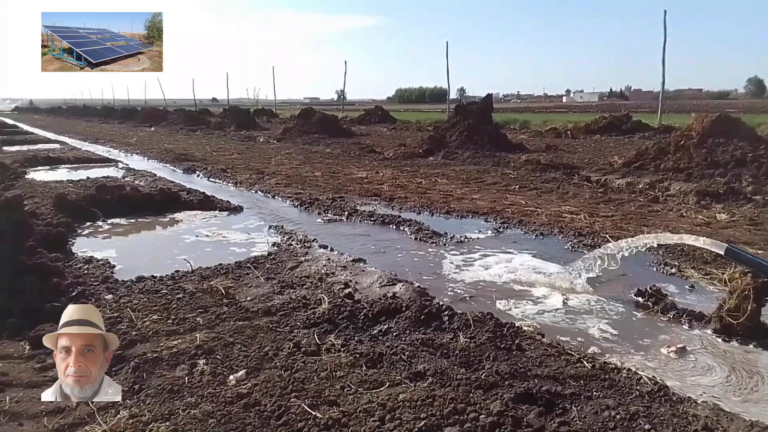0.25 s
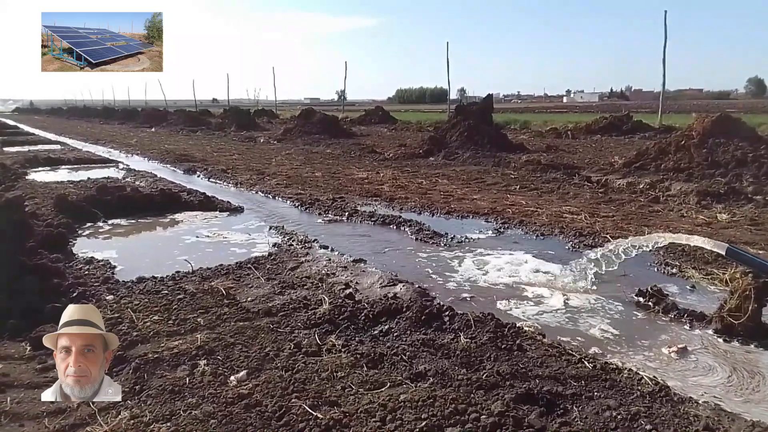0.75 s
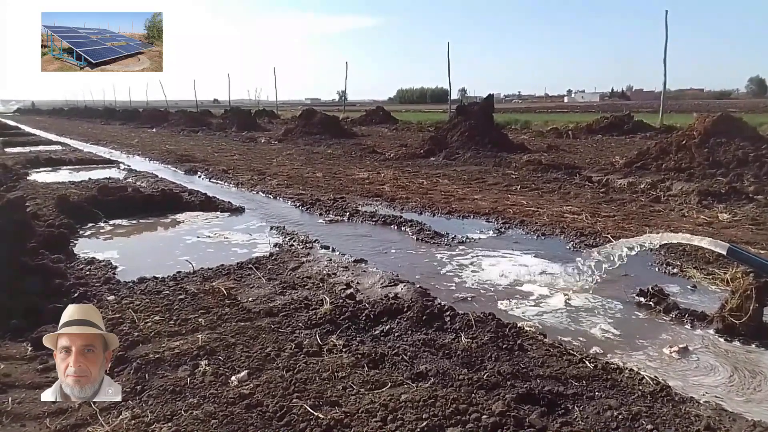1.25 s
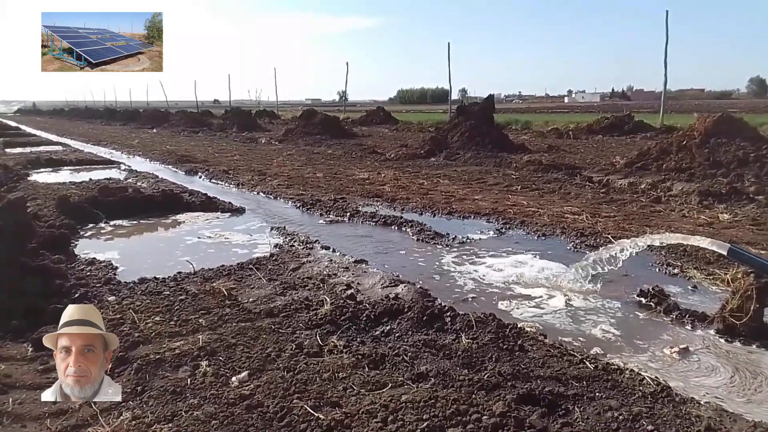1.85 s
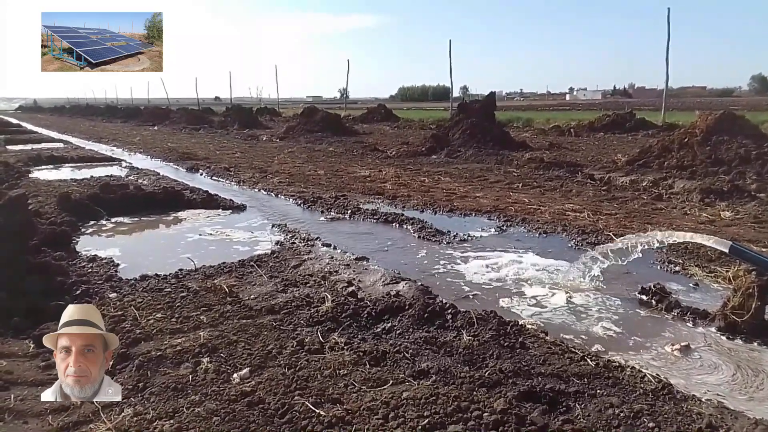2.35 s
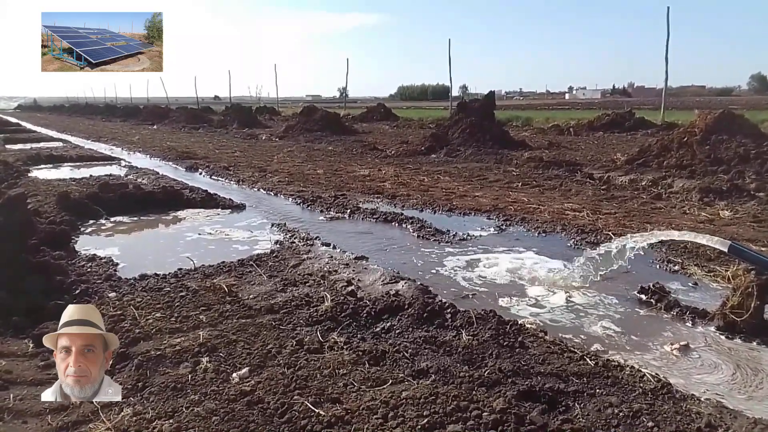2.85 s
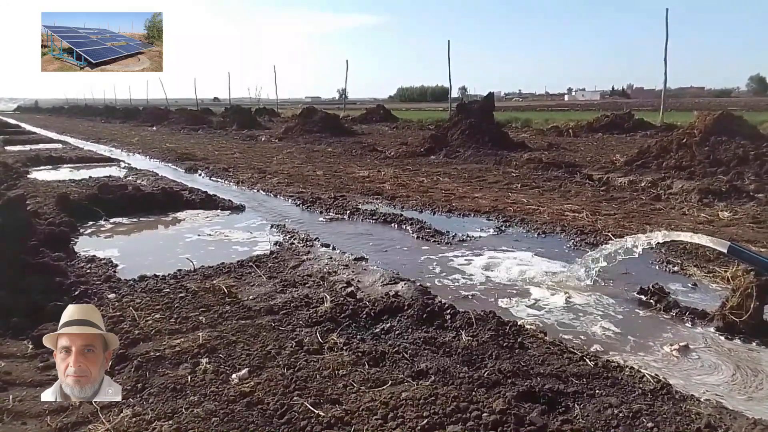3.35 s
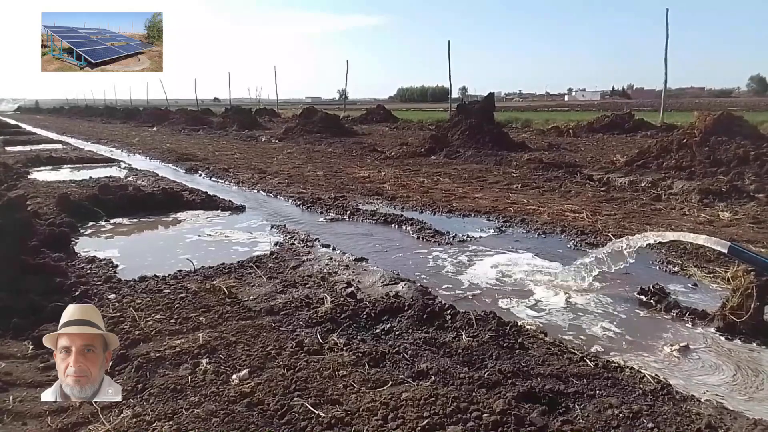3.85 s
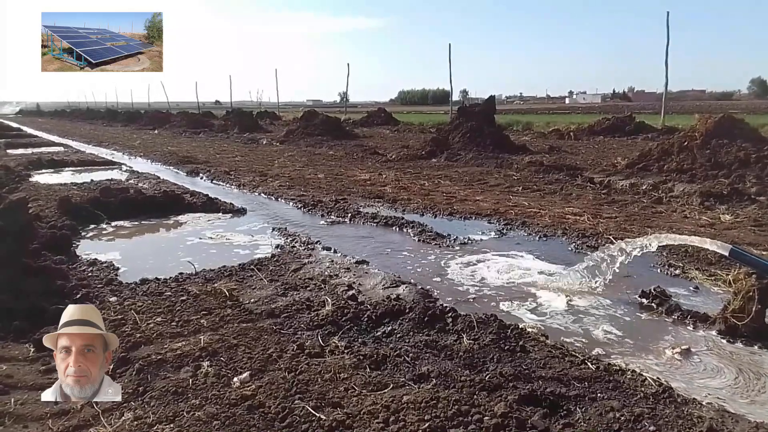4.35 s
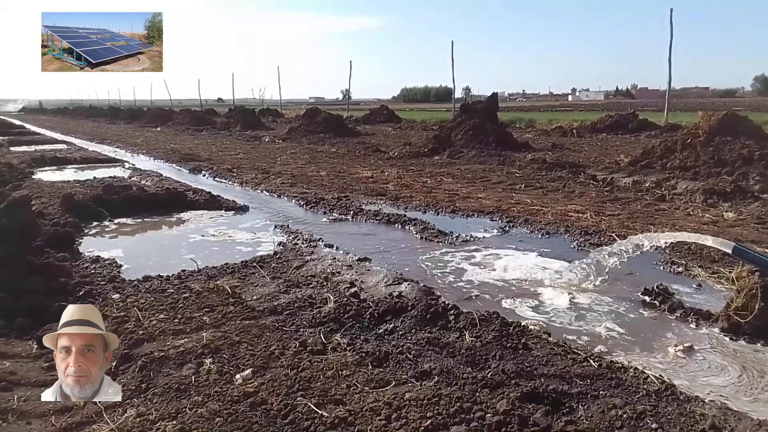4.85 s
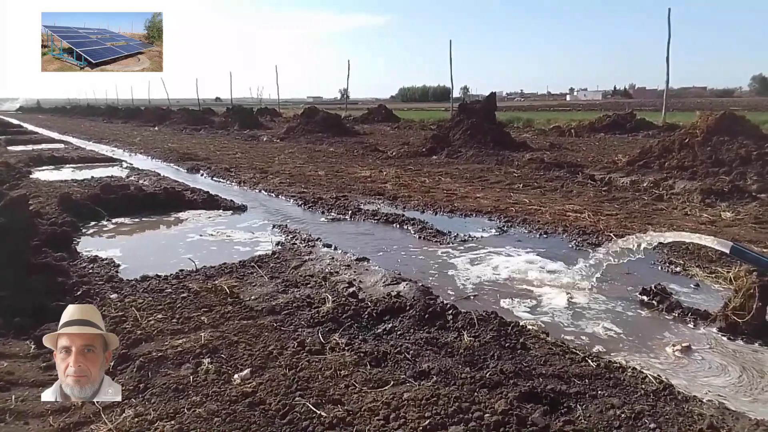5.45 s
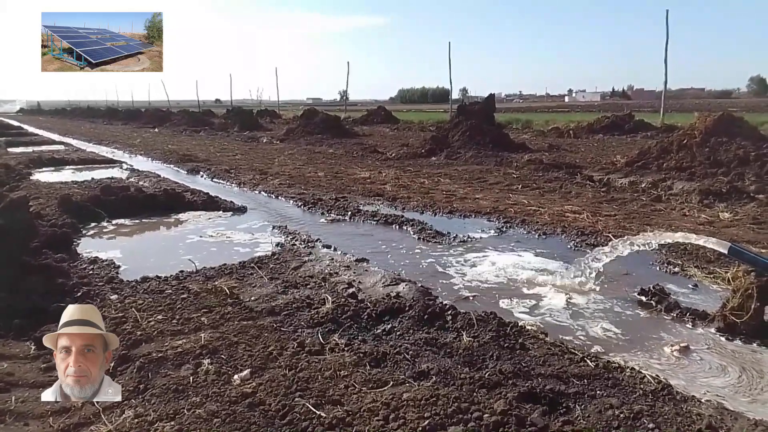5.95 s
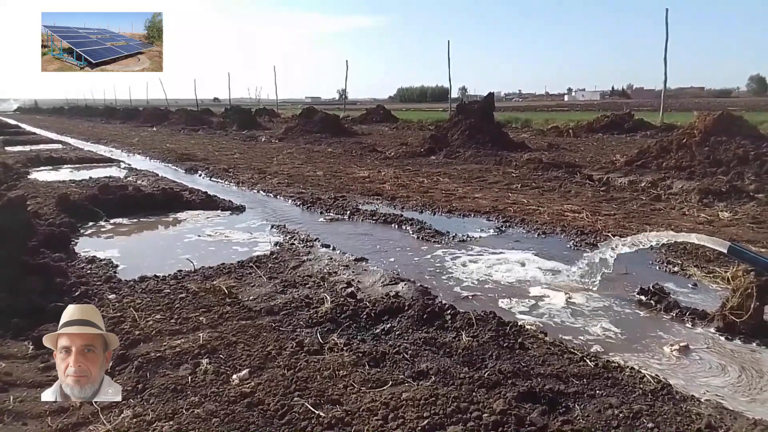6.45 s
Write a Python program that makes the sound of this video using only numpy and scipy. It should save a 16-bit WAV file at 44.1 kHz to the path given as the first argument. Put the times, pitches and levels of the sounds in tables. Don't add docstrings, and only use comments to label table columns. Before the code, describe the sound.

Water gushes from a hose into standing water, already running at the start and still running at the end. Trapped air bubbles ring briefly with pitches gliding slightly upward, deep gulps and weak low thuds sit underneath, and crackly hiss with tiny ticks lies on top. The level stays nearly steady, dipping briefly in the middle. Open air, dry and fairly near, practically mono, thin in bass, with a peaky, boxed-in treble.

```python
import sys
import numpy as np
from scipy import signal
from scipy.fft import irfft
from scipy.io import wavfile
from scipy.ndimage import uniform_filter1d

SR = 44100
rng = np.random.default_rng(int(sys.argv[2]) if len(sys.argv) > 2 else 0)


def materialize(psi):
    bounded = np.clip(np.atleast_2d(psi).T, -1, 1)
    quanta = np.round(bounded * 32767).astype(np.int16)
    wavfile.write(sys.argv[1], SR, quanta)


def convert_level_to_amplitude(level_db):
    exponent = np.asarray(level_db, float) / 20
    return 10 ** exponent


N = 295029

# (frequency [Hz], level [dB per Hz])
SPRAY_SPECTRUM = [(2290, -33.5), (3900, -25), (4640, -17.5), (5210, -16), (5560, -11.5), (6500, -13.5),
                  (6930, -10), (8100, -6.5), (8680, 1), (10000, 0.5), (10700, -3), (12800, -22),
                  (13900, -23), (15600, -31)]


def evened(x):
    return x / np.sqrt(np.mean(x ** 2) + 1e-20)


def add(mix, time_s, sound):
    part = mix[round(time_s * SR):][:len(sound)]
    part += sound[:len(part)]


def below(x, cutoff_hz):
    return signal.sosfiltfilt(signal.butter(3, cutoff_hz, fs=SR, output="sos"), x)


def causal(x, gain_db):
    log_gain = np.log(convert_level_to_amplitude(np.maximum(gain_db, -100)))
    mirrored = np.r_[log_gain, log_gain[-2:0:-1]]
    phase = -signal.hilbert(mirrored).imag[:len(log_gain)]
    taps = irfft(np.exp(log_gain + 1j * phase))[:2048]
    taps = taps[(None,) * (x.ndim - 1)]
    return signal.oaconvolve(x, taps, axes=-1)[..., :x.shape[-1]]


def coloured(x, spectrum):
    point_hz, level_db = np.transpose(spectrum)
    hz = np.fft.rfftfreq(8192, 1 / SR)
    return causal(x, np.interp(np.log(hz + 1), np.log(point_hz + 1), level_db))


def tremor(ms):
    size = max(int(ms * SR / 1000), 1)
    smooth = uniform_filter1d(rng.standard_normal(N), size)
    return evened(uniform_filter1d(smooth, size))


def swells(rows, half_s, column=1):
    rows = np.transpose(rows)
    coarse_s = np.arange(0, N + 100, 100) / SR
    humps = np.exp(-.5 * ((coarse_s - rows[0][:, None]) / half_s) ** 2)
    return np.interp(np.arange(N) / SR, coarse_s, rows[column] @ humps)


def flow():
    # (time [s], pool lift [dB], spray lift [dB])
    surges = [(0.155, -1.7, 2.5), (0.274, 0.2, 1.5), (0.359, 3, 2), (0.564, 1, 5), (0.943, 1, 2.3),
              (1.093, 0.5, 3.5), (1.312, 3.5, 3), (1.751, 0.4, 4.5), (2.085, 1, 4), (2.405, -0.3, 2.5),
              (2.534, -0.5, 3.5), (2.724, 1.5, 1.5), (2.928, 1, 2.5), (3.138, 1.5, 5), (3.417, 1, 3),
              (3.527, 4, 5.5), (3.896, 2, 2.5), (4.086, -0.5, 5), (4.375, 0.5, 1), (4.53, 3, 1),
              (4.664, 2.5, 2), (5.034, 0.7, 5.2), (5.163, 0.5, 3.5), (5.313, 1.2, 1.6), (5.398, 3, 0.5),
              (5.572, 0.6, 5), (5.946, -1, -0.5), (6.141, 0.8, 0.5), (6.351, 0.5, 1), (6.46, -2, 4)]
    # (time [s], level [dB])
    lulls = [(0.04, 1), (0.69, -1), (1.17, -1), (1.45, -1.5), (1.84, 0), (2.22, -3), (2.62, -2), (3.05, -1),
             (3.31, -1), (3.62, -3), (3.77, -5.5), (4.25, 0.5), (5.69, -1.5), (6.23, -3), (6.58, -0.5)]
    surge_s, lull_s = 0.027, 0.016
    pool_db, spray_db, patter_db = -35, -34, -47
    pool = swells(surges, surge_s)
    fine = swells(surges, surge_s, column=2)
    lull = swells(lulls, lull_s)
    patter = 0.95 * pool + 0.36 * fine
    return pool_db + pool + lull, spray_db + fine + lull, patter_db + patter + lull


def wash(patchy_db, wide, long):
    real, imag, patches = rng.standard_normal((N // 64 + 5, 129, 3)).T
    patches = uniform_filter1d(patches, int(wide), 0)
    patches = evened(uniform_filter1d(patches, int(long), 1))
    bins = (real + 1j * imag) * convert_level_to_amplitude(patchy_db * patches)
    return evened(signal.istft(bins, nperseg=256, noverlap=192)[1][:N])


def bubble(hz, cycles, glide, rise):
    u = np.arange(int(4 * cycles * SR / hz) + 2) * hz / SR / cycles
    shape = (1 - np.exp(-u / rise)) * np.exp(-2 * u)
    return shape / shape.max() * np.sin(2 * np.pi * cycles * (u + glide * u ** 2 / 2))


def grains(lo_hz, hi_hz, per_s, cycles, spread_db, clumps, count=36):
    draw, kind, size = rng.random((3, N))
    strength = convert_level_to_amplitude(spread_db * np.minimum(-np.log(size + 1e-9), 4))
    hits = (draw < per_s * clumps / SR) * strength
    kind = (kind * count).astype(int)
    out = np.zeros(N)
    for k, hz in enumerate(np.geomspace(lo_hz, hi_hz, count)):
        ring = bubble(hz, cycles * rng.uniform(0.57, 2.67), rng.uniform(-0.09, 0.25), rise=0.065)
        ring *= np.sqrt(hz) / np.linalg.norm(ring)
        out += signal.oaconvolve(hits * (kind == k), ring)[:N]
    return evened(out)


def churn(shake):
    # (frequency [Hz], level [dB per Hz])
    pool_spectrum = [(24, -52), (40, -51), (113, -26.5), (220, -14), (277, -15), (336, -21), (608, -8),
                     (1810, -2), (1990, -1), (2190, -2), (2420, -15), (2660, -11.5), (3040, -16),
                     (3480, -13.5), (3900, -19), (5070, -28), (8580, -120)]
    # (time [s], level [dB])
    thumps = [(0.569, 2), (1.152, 6), (1.561, 5.0), (1.816, 4.8), (2.19, 9), (2.305, -2), (2.514, 4),
              (2.699, 7), (2.804, 4.5), (3.278, 11), (3.387, 5), (3.856, 6), (3.966, 4), (4.32, 6),
              (4.46, 3.3), (4.814, 10), (4.959, 7), (5.054, 2.8), (5.383, 3), (5.562, 4.1), (6.086, 5.1),
              (6.41, 2.5), (6.495, 4), (6.685, 3.5)]
    lumps_db = 1.5 * shake + 1.5 * tremor(ms=12)
    clumps = convert_level_to_amplitude(3.0 * shake)
    bubbles = grains(145.5, 4200, per_s=1200, cycles=5.38, spread_db=2.5, clumps=clumps)
    raw = convert_level_to_amplitude(lumps_db) * wash(patchy_db=2.5, wide=3, long=11.0) + convert_level_to_amplitude(-6.0) * bubbles
    gurgle = grains(105.7, 479, per_s=90, cycles=2.5, spread_db=3.5, clumps=clumps, count=14)
    full = coloured(raw + convert_level_to_amplitude(-14.5) * gurgle, pool_spectrum)
    low, body = below(full, 468), below(full, 2560)
    pool_db, _, patter_db = flow()
    thud = convert_level_to_amplitude(-55 + swells(thumps, half_s=0.022)) * evened(low)
    pool = convert_level_to_amplitude(pool_db) * evened(body - low)
    patter = convert_level_to_amplitude(patter_db - 4.5) * evened(full - body)
    return thud + pool + patter


def spray(shake):
    lumps_db = 1.42 * shake + 1.77 * tremor(ms=3.9)
    fizz = grains(3800, 16000, per_s=2500, cycles=8, spread_db=5, clumps=convert_level_to_amplitude(2.5 * shake))
    hits = (rng.random(N) < 110 / SR) * convert_level_to_amplitude(6 * np.minimum(rng.exponential(1, N), 3))
    decay = np.exp(-np.arange(300) / 55)
    ticks = signal.oaconvolve(hits, decay)[:N] * rng.standard_normal(N)
    hiss = convert_level_to_amplitude(lumps_db) * wash(patchy_db=3.5, wide=7, long=5.9)
    full = coloured(hiss + convert_level_to_amplitude(-2.0) * fizz + convert_level_to_amplitude(-2.0) * evened(ticks), SPRAY_SPECTRUM)
    patter = below(full, 5740)
    _, spray_db, patter_db = flow()
    return convert_level_to_amplitude(spray_db) * evened(full - patter) + convert_level_to_amplitude(patter_db - 2.0) * evened(patter)


def plops():
    # (time [s], peak [dB], pitch [Hz], ring [cycles])
    large_bubbles = [(0.117, -14, 1880, 10), (0.304, -12, 2060, 3.5), (0.537, -11, 1540, 7),
                     (0.567, -11, 1440, 6.7), (0.939, -3.5, 1530, 5.6), (1.018, -12.5, 1900, 9.2),
                     (1.303, -13, 1770, 4), (1.424, -13.5, 1450, 6.7), (1.707, -12.5, 1970, 11),
                     (2.419, -11.5, 2000, 7.4), (2.506, -7.5, 2030, 3.5), (2.543, -11.5, 1900, 5),
                     (2.687, -9.5, 1490, 3.8), (2.776, -5.5, 1810, 5.2), (2.903, -10.5, 2040, 12),
                     (3.142, -10, 1620, 3.6), (3.685, -11, 1700, 2.9), (3.77, -12.5, 1440, 5),
                     (3.867, -10.5, 1650, 4.7), (4.037, -8, 1890, 5.7), (4.365, -7, 1670, 3.2),
                     (4.592, -11.5, 1470, 8.6), (4.663, -10, 1940, 12), (5.312, -11, 1260, 4.7),
                     (5.446, -7, 1950, 8.6), (5.551, -12.5, 1900, 7), (5.92, -11, 2040, 7.7),
                     (6.017, -8.5, 1740, 6), (6.147, -12.5, 2030, 12), (6.633, -13.5, 2040, 5.3)]
    # (time [s], peak [dB], pitch [Hz], ring [cycles])
    deep_gulps = [(0.269, -21, 859, 3.6), (0.348, -16, 886, 6.2), (0.564, -19, 821, 5.2),
                  (0.687, -22, 900, 4), (1.85, -20.5, 655, 5.1), (2.464, -21, 770, 5.3),
                  (2.646, -20.5, 760, 4), (2.842, -19, 583, 7.2), (2.853, -20, 1400, 6),
                  (3.507, -21, 842, 4.6), (3.864, -22, 830, 5.5), (4.246, -19.5, 687, 3.1),
                  (4.601, -23, 780, 5.8), (4.824, -15.5, 970, 4.6), (5.04, -20, 800, 4),
                  (5.433, -15.5, 784, 3), (5.54, -19.5, 744, 4.6), (5.611, -17, 630, 6.1),
                  (5.783, -20, 720, 5.9), (6.51, -17.5, 996, 4.8)]
    # (time [s], peak [dB], pitch [Hz], ring [cycles])
    bright_drips = [(0.262, -17, 5680, 7.7), (0.3351, -16, 6150, 6), (0.5354, -16, 5440, 6),
                    (0.818, -23, 4840, 17), (1.568, -11, 6040, 6), (2.7763, -14, 5530, 6.9),
                    (2.9462, -24, 6050, 6), (3.1418, -20, 4900, 9.6), (3.2315, -21, 5390, 6),
                    (3.87, -18.5, 5200, 7), (3.532, -13, 5600, 5.1), (3.8605, -18, 2720, 6.6),
                    (5.4844, -16.5, 5430, 7.7), (5.5672, -5.5, 4970, 4), (5.5962, -19, 5600, 6),
                    (5.9547, -13, 5720, 5.1), (6.635, -11, 5800, 3.4)]
    out = np.zeros(N)
    for time_s, peak_db, hz, cycles in [*large_bubbles, *deep_gulps, *bright_drips]:
        ring = bubble(hz, np.clip(cycles, 1.5, 14), glide=0.019, rise=0.16)
        add(out, time_s, convert_level_to_amplitude(peak_db - 8.0) * ring)
    return out


def snaps():
    # (time [s], peak [dB], centre [Hz], length [ms])
    drop_slaps = [(0.29, -16, 9500, 2.9), (0.3765, -14, 8900, 1.2), (0.5876, -12, 10670, 1.1),
                  (0.819, -12, 8350, 0.7), (1.1028, -14, 9640, 1.5), (1.3427, -12.5, 8420, 1.8),
                  (1.4225, -13.5, 9800, 2), (1.4674, -15, 8730, 0.79), (1.7595, -10, 9100, 0.78),
                  (2.0624, -12.5, 9930, 1), (2.4028, -8, 9050, 0.81), (2.5457, -13, 8340, 1.3),
                  (2.777, -14.5, 10100, 1.2), (2.902, -13.5, 9700, 1.4), (3.1398, -16, 10100, 1.3),
                  (3.3935, -5.5, 9900, 0.6), (3.408, -14, 8300, 1), (3.495, -16, 8500, 1.6),
                  (4.2227, -17, 8910, 1.1), (4.3819, -9.5, 9700, 1.4), (4.5087, -12, 8570, 0.63),
                  (5.0392, -13, 8730, 1.3), (5.3616, -13.5, 8600, 1.5), (5.4161, -9, 9900, 1.06),
                  (5.5665, -12.5, 9300, 1.3), (5.956, -15.5, 10600, 2.6), (6.1656, -8.5, 9700, 0.58),
                  (6.3803, -13.5, 9750, 0.88), (6.441, -18, 8800, 1.1), (6.6336, -13.5, 9100, 1)]
    out = np.zeros(N)
    ms = np.arange(600) * 1000 / SR
    time_s, peak_db, hz, long_ms = np.transpose(drop_slaps)[..., None]
    u = ms / np.clip(long_ms, .3, 5)
    shape = u ** 2 * np.exp(-2.6 * u)
    drive = 1.5 * rng.standard_normal(u.shape) + np.sin(2 * np.pi * hz * ms / 1000)
    slaps = coloured(shape * drive, SPRAY_SPECTRUM)
    slaps = convert_level_to_amplitude(peak_db + 1.2) * slaps / abs(slaps).max(1, keepdims=True)
    for at_s, slap in zip(time_s[:, 0], slaps):
        add(out, at_s, slap)
    return out


def scene():
    shake = evened(tremor(ms=22) + .8 * tremor(ms=6))
    mono = churn(shake) + spray(shake) + plops() + snaps()
    return np.tile(mono, (2, 1))


def thinned(x):
    # (time [s], from [Hz], to [Hz], level under sound [dB])
    splits = [(.115, 4700, 7500, -16), (.115, 11600, 14000, -12), (.40, 4300, 16000, -14),
              (.99, 4600, 6500, -12), (1.755, 4200, 16000, -10), (3.17, 12400, 15900, -8),
              (3.415, 5200, 8000, -20), (4.07, 13800, 15200, -10), (4.63, 9600, 12000, -12),
              (5.415, 4300, 12500, -24), (5.45, 6200, 9900, -14), (6.40, 4700, 6500, -10)]
    # (time [s], level [dB])
    treble_floor = [(0, 1), (2.1, 1), (2.2, 4), (2.88, 5), (2.92, -2), (3.55, -2), (3.65, 3), (5, 2),
                    (5.3, 4), (6.69, 6)]
    hz, t, z = signal.stft(x, SR, nperseg=1024)
    power = uniform_filter1d(uniform_filter1d(abs(z) ** 2, 6, 0), 2, 1)
    level_db = 10 * np.log10(power + 1e-20)
    bright_db = 10 * np.log10((abs(z[hz > 8000]) ** 2).sum(0) + 1e-20)
    sharp = bright_db > np.percentile(bright_db, 99)
    floor_db = uniform_filter1d(bright_db, 25) - 52.5 + np.interp(t, *np.transpose(treble_floor))
    bin_hz = hz[:, None]
    weak = (bin_hz > 14700) & (level_db < floor_db)
    edge = np.where(bin_hz < 15690, 1, convert_level_to_amplitude(-16) * sharp * (bin_hz < 16600))
    z = z * ~weak * edge
    side = np.zeros(z.shape)
    for time_s, lo_hz, hi_hz, db in splits:
        side += convert_level_to_amplitude(db + 5) * np.outer((hz > lo_hz) & (hz < hi_hz), abs(t - time_s) < .016)
    side = side * abs(z) * np.exp(2j * np.pi * rng.random(z.shape))
    return signal.istft(np.array([z + side, z - side]), SR, nperseg=1024)[1][:, :N]


def low_pass(x):
    return signal.sosfilt(signal.butter(12, 16470, fs=SR, output="sos"), x)


def record(dry):
    # (frequency [Hz], width [Hz], level [dB])
    hollows = [(2990, 150, -6), (3850, 260, -10), (4350, 180, -5), (5170, 200, -4), (5870, 200, -3),
               (6530, 240, -11), (8250, 250, -4), (9150, 300, -3.5), (13450, 250, 4), (13950, 180, -7),
               (14300, 300, 4), (15170, 300, -5), (15550, 220, 7)]
    hz = np.fft.rfftfreq(8192, 1 / SR)
    housing_db = sum(db / (1 + (2 * (hz - f) / width) ** 2) for f, width, db in hollows)
    mix = thinned(causal(dry.mean(0), housing_db))
    return low_pass(mix)


dry = scene()
out = record(dry)
materialize(out)
```